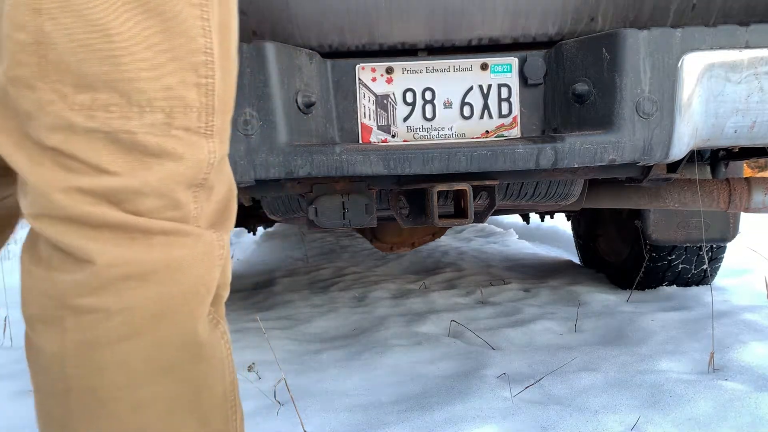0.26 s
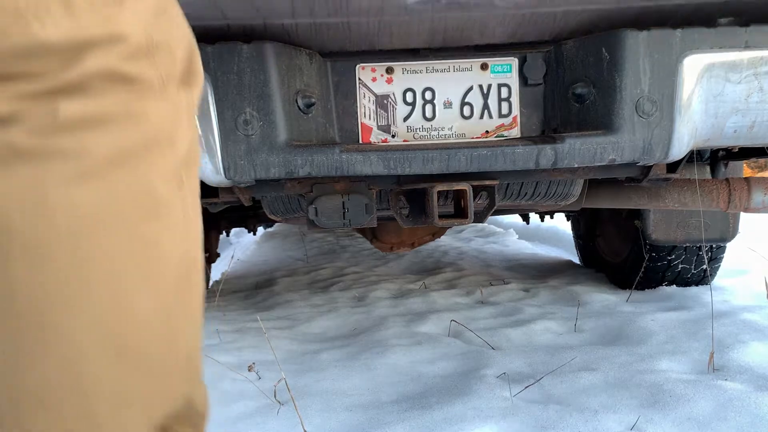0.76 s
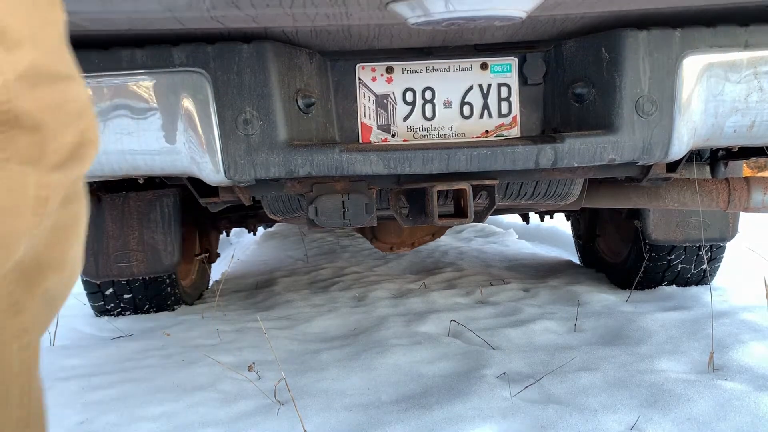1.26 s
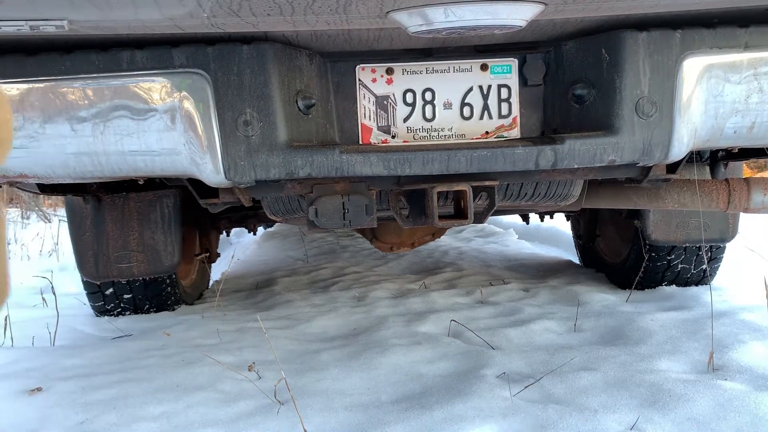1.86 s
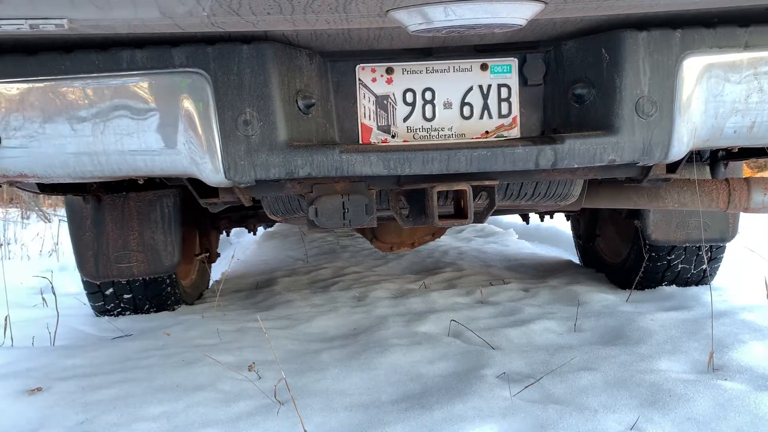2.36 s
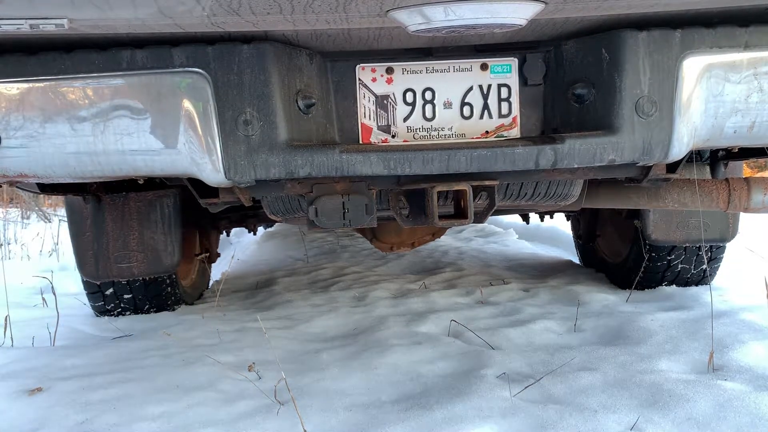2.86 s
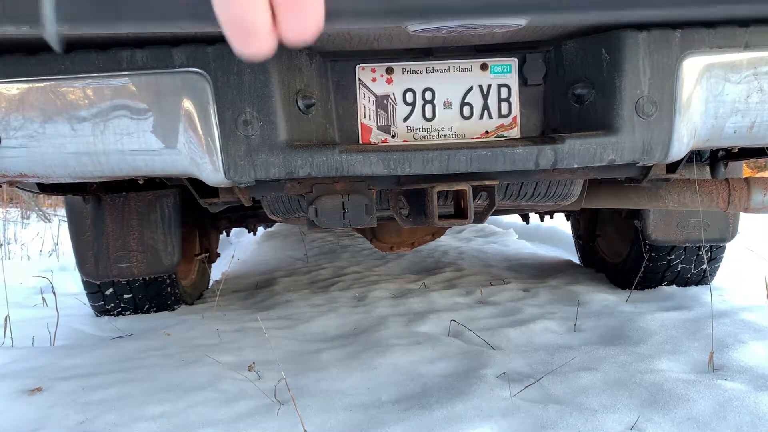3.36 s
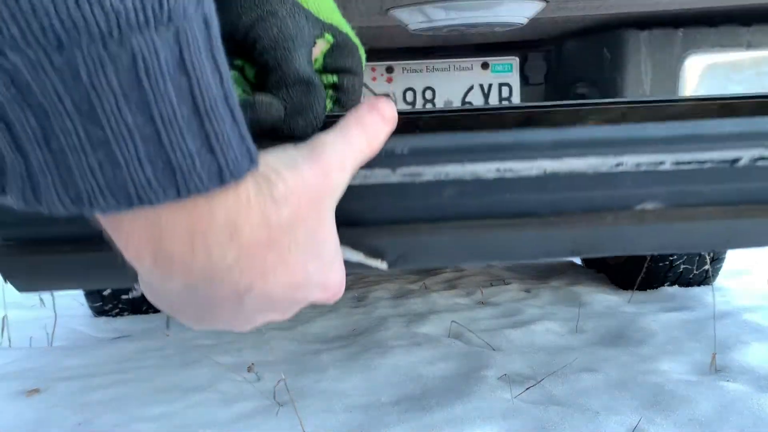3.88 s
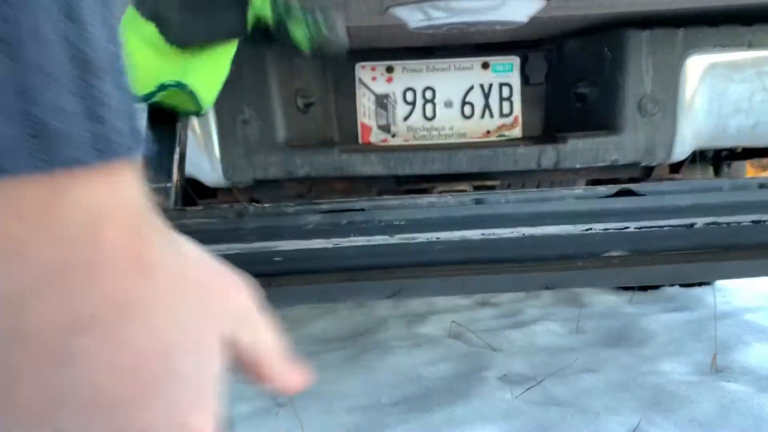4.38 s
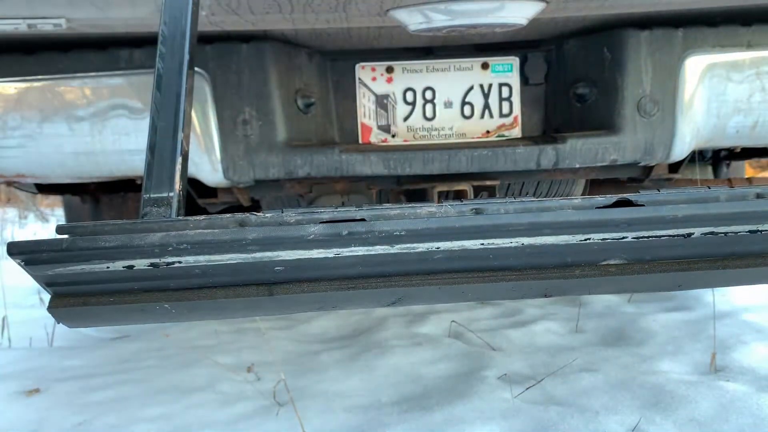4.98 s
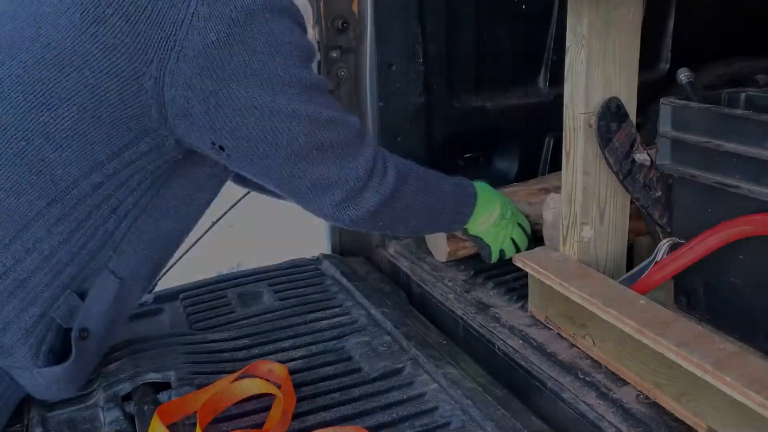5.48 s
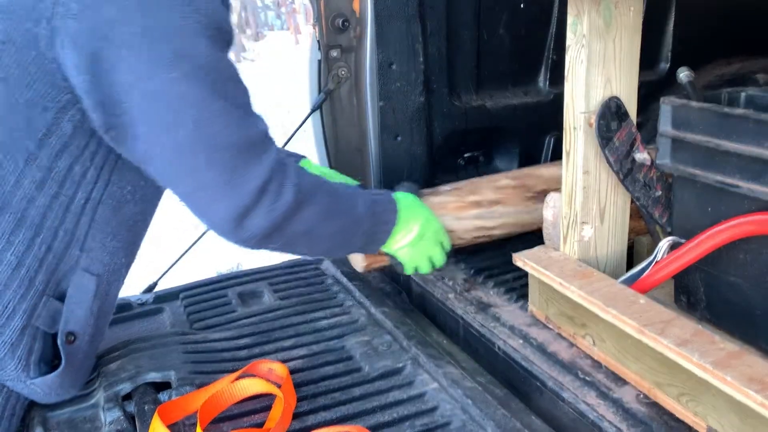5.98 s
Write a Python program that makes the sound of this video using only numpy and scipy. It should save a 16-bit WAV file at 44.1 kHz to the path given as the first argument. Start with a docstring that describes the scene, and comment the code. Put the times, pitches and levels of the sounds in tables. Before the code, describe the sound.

Outdoors in snow: cloth rub, crunching steps, jingling pins, a heavy rail dragged and dropped in two bumps, silence, then a log shoved along.

```python
"""Unloading a pickup in snow

Someone in canvas work trousers walks through crusted snow behind a pickup, steel pins jingling in one hand.
A steel rail is dragged off the truck bed with a clank and set down in two bumps; the pins jingle again.
After a fade through silence, a log scrapes over the bed liner and knocks against the bed.
Blows are decaying octave noise plus damped modes, pins are clicks and modes, rubbing is shaped grainy noise."""
import sys
import numpy as np
from scipy import signal
from scipy.fft import rfft, irfft, next_fast_len
from scipy.io import wavfile
from scipy.ndimage import uniform_filter1d, map_coordinates

SR = 44100
rng = np.random.default_rng(int(sys.argv[2]) if len(sys.argv) > 2 else 0)


def put_to_file(sound):
    """Save the sound as 16-bit audio at rate SR, in the file named by the first command-line argument."""
    columns = np.atleast_2d(sound).T  # one column per channel
    safe = np.clip(columns, -1, 1)
    whole_steps = np.round(safe * 32767)
    wavfile.write(sys.argv[1], SR, whole_steps.astype(np.int16))


N = 274743
TIME = np.arange(N) / SR
OCTAVES_HZ = 50 * 2 ** np.arange(9)

# Boots in snow. Each row: start in seconds, level in dB, bass in dB, treble in dB.
STEPS = [(0.455, -46.5, 17.5, 8), (0.674, -16.5, -2, -31), (0.751, -10, -2, -5), (0.769, -5.5, -3.5, -7.5),
         (0.804, -27.5, 14, -13), (0.864, -20, 0.5, -19)]
# Rail clanks on the truck bed. Each row: start in seconds, level in dB, bass in dB, treble in dB,
# rise in seconds, length factor.
KNOCKS = [(2.917, -8, -29.5, -4.5, 0.00098, 1), (2.928, -8, -17, -21, 0.0021, 0.4),
          (2.972, -11, -10, -2.5, 0.0011, 0.8)]
# Rail bumps down. Each row: start in seconds, level in dB, bass in dB, treble in dB,
# rise in seconds, length factor.
BUMPS = [(4.007, -4, -14, -9, 0.0018, 0.61), (4.02, -21, 7.5, -20, .003, 0.64),
         (4.168, -15, -11, -5, .002, 0.32), (4.1725, -7, -6, -4.5, 0.0015, 0.58),
         (4.181, -12.5, -3, -4.5, .0012, .45), (4.197, -9, -6, -15, 0.0012, 0.44),
         (4.202, -10, -14.5, -1.5, 0.00147, 0.71), (4.216, -22.5, 7, -14, .003, 0.47)]


def amp(db):
    """Amplitude of a level in dB."""
    return 10 ** (np.asarray(db) / 20)


def unit(x):
    """x at rms 1."""
    return x / np.sqrt(np.mean(x ** 2) + 1e-20)


def along(points, hz):
    """Interpolate (Hz, value) points on a log frequency axis."""
    f, v = np.transpose(points)
    return np.interp(np.log(hz + 1), np.log(f + 1), v)


def wobble(rate_per_s, size=N):
    """Smooth random curve through rate_per_s knots a second."""
    knots = rng.standard_normal(int(size * rate_per_s / SR) + 4)
    return map_coordinates(knots, [np.arange(size) * rate_per_s / SR])


def filtered(x, response):
    """x times a complex response of frequency."""
    size = x.shape[-1]
    m = next_fast_len(size + 4096)
    return irfft(rfft(x, m) * response(np.fft.rfftfreq(m, 1 / SR)), m)[..., :size]


def coloured(x, spectrum):
    """x through (Hz, dB) points."""
    return filtered(x, lambda hz: amp(along(spectrum, hz)))


def add(track, start_s, sound):
    """Mix a sound in at start_s."""
    part = track[:, max(round(start_s * SR), 0):][:, :sound.shape[-1]]
    part += sound[..., :part.shape[-1]]


def ports(pair, lead_ms, scatter):
    """Direct and scattered sound reach two microphones; above 7.5 kHz the delay is the same for every source."""
    # Share of unrelated sound. Each row: frequency in Hz, mixing angle in rad before the scatter factor.
    stray_angles = [(100, 0.13), (400, 0.33), (1000, 0.64), (2500, 0.56), (7000, 0.9), (9500, 0.16),
                    (16000, 0.033)]

    def half_delay(hz):
        delay_ms = np.interp(hz, [5500, 7500], [lead_ms, -.288])
        return np.exp(1j * np.pi * hz * delay_ms / 1000 * np.array([[1], [-1]]))

    def shares(hz):
        angle = scatter * along(stray_angles, hz)
        return np.array([np.cos(angle), np.sin(angle)])

    direct, stray = filtered(pair, shares)
    return filtered(np.array([direct + stray, direct - stray]), half_delay)


def grainy(rate_per_s, depth_db, size=N):
    """Two noises bunched into the same tiny slips."""
    slips = amp(depth_db * wobble(rate_per_s, size=size))
    return unit(rng.standard_normal((2, size)) * slips)


def ring(modes, t, age, vary_db, detune):
    """Damped modes; each contact point and grip gives them new strengths and slightly new pitches."""
    total = 0
    for hz, db, t60 in modes:
        decay = amp(db + vary_db * rng.normal() - 60 * age / t60)
        pitch_hz = hz * (1 + detune * rng.normal())
        total = total + decay * np.sin(2 * np.pi * (pitch_hz * t + rng.random((2, 1))))
    return total


def blows(rows, body, modes, ring_db, grit_db, gain_db, cycles):
    """Each blow is a gritty burst whose octaves die at their own speeds, plus the ring of the body."""
    out, t = np.zeros((2, N)), np.arange(SR * 4 // 9) / SR
    body = np.array(body)
    band_db, band_t60 = along(body[:, [0, 1]], OCTAVES_HZ), along(body[:, [0, 2]], OCTAVES_HZ)

    def octave(hz):
        distance = np.abs(np.log2((hz + 1) / OCTAVES_HZ[:, None, None]))
        return np.sqrt(np.clip(1 - distance, 0, 1))

    def build_up(hz):  # the heavy, low motion takes longest to start
        return 1 - np.exp(-(t * hz / cycles) ** 2)

    for start_s, db, bass_db, treble_db, rise_s, length in rows:
        age = t / max(length, .1)
        colour_db = along([(110, bass_db), (300, 0), (2500, 0), (7000, treble_db)], OCTAVES_HZ)
        bands = filtered(grainy(350, grit_db, size=len(t)), octave)
        ringing = sum(ring([mode], t, age, vary_db=2.5, detune=0.011) * build_up(mode[0]) for mode in modes)
        sound = amp(ring_db) * ringing
        for band, hz, level_db, t60 in zip(bands, OCTAVES_HZ, band_db + colour_db, band_t60):
            shape = amp(level_db - 60 * age / t60) * build_up(hz)
            sound = sound + unit(band * shape) * np.sqrt(np.mean(shape ** 2))
        add(out, start_s, amp(db + gain_db) * sound * (1 - np.exp(-t / max(rise_s, 1e-4))))
    return out


def contacts(rows, rise_s, length):
    """Give contacts of one kind their rise and length factor: the softer, the shorter."""
    halving_db = 43  # a contact this much softer dies twice as fast
    hardest_db = max(row[1] for row in rows)
    return [(*row, rise_s, length * .5 ** ((hardest_db - row[1]) / halving_db)) for row in rows]


def footsteps():
    """Boots break the crust: noise bursts without modes."""
    # Octave spread of a blow on snow. Each row: frequency in Hz, level in dB, t60 in seconds at length 1.
    snow = [(47.5, 0.5, 0.71), (99, -0.5, 0.43), (197, -11, 0.83), (397, -6.5, 0.39), (1570, -15.5, 0.37),
            (3270, -13.5, 0.17), (12800, -11, 0.29)]
    rows = contacts(STEPS, rise_s=0.003, length=0.92)
    return blows(rows, snow, [], ring_db=0, grit_db=1.5, gain_db=-7, cycles=0.61)


def bed_knocks():
    """The rail strikes the truck bed and excites its damped modes."""
    # Octave spread on the bed. Each row: frequency in Hz, level in dB, t60 in seconds at length 1.
    bed = [(50, -13, 0.46), (118, -1.5, 0.42), (402, -5.5, 0.39), (895, -1, 0.1), (1790, -9.5, 0.094),
           (3600, -13, 0.24), (8150, 4, 0.044), (12940, -3.5, 0.098)]
    # Ringing modes of the bed. Each row: frequency in Hz, level in dB, t60 in seconds at length 1.
    bed_modes = [(128.2, -13, 0.7), (174, -9.5, 0.35), (330, -14, 0.65), (381, -2.5, 0.52),
                 (420, -6.5, 0.22), (542, -4, 0.19), (637, -2.5, 0.11), (767, -4, 0.12), (860, -6, 0.17),
                 (1027, -6, 0.17), (1170, -9.5, 0.22), (1560, -11.5, 0.11), (1930, -11, .13),
                 (2245, -13.5, 0.16), (2490, -16.5, 0.18), (3950, -12.5, .1)]
    return blows(KNOCKS, bed, bed_modes, ring_db=-1.0, grit_db=-1.5, gain_db=-4.5, cycles=0.97)


def rail_bumps():
    """The rail hits the ground and rings in its own damped modes."""
    # Octave spread of the rail. Each row: frequency in Hz, level in dB, t60 in seconds at length 1.
    rail = [(50, -12, 0.97), (101, 4, 0.39), (382, -21.5, 0.66), (1076, -16.5, 0.32), (2580, -16.5, 0.18),
            (6440, -2, 0.13), (12580, 2.5, 0.067)]
    # Ringing modes of the rail. Each row: frequency in Hz, level in dB, t60 in seconds at length 1.
    rail_modes = [(116, -6.5, 0.4), (163, -20, 0.35), (337, -5, 0.27), (384.8, -4, 0.34), (684, -7, 0.22),
                  (840, -2.5, 0.14), (1000, 7, 0.05), (1157, 6, 0.053), (1560, -7, 0.085), (2000, -4, 0.1),
                  (2230, -6.5, 0.1), (2405, 0, 0.085), (2610, -3.5, 0.07), (3940, -5.5, 0.07),
                  (4750, -12.5, .1)]
    return blows(BUMPS, rail, rail_modes, ring_db=-5.5, grit_db=1.5, gain_db=-7.0, cycles=2.2)


def rail_taps():
    """Light taps and scuffs of the rail: brief noise over a weak ring."""
    # Taps. Each row: start in seconds, level in dB, bass in dB, treble in dB.
    taps = [(1.965, -24.5, -20, -23), (2.138, -21, 14, -2), (2.343, -21.5, -14, -13),
            (2.834, -16, -19.5, -3), (2.869, -24, -11.5, 18), (3.006, -17.5, 4, -20), (3.031, -19.5, 9, 3),
            (3.08, -20, 11, 5), (3.186, -34, -4, 7.5), (3.276, -35.5, 3, 6), (3.332, -38.5, -6, 6),
            (3.557, -27.5, -16.5, -26), (3.610, -32.5, 6, 3), (4.163, -20.5, -0.5, -3),
            (4.274, -31, -4.5, -4), (4.304, -38, 7, 11), (4.376, -42.5, 2, 20), (4.652, -41, -16, 22)]
    # Octave spread of a tap. Each row: frequency in Hz, level in dB, t60 in seconds at length 1.
    light = [(47.1, -8.5, 0.16), (299.6, -5.5, 0.064), (1000, -6, 0.074), (2300, -12, 0.12),
             (5000, -3.5, 0.007), (13060, 0, 0.024)]
    # Ringing modes of a tap. Each row: frequency in Hz, level in dB, t60 in seconds at length 1.
    light_modes = [(304, -6.5, .2), (1210, -1.5, 0.082), (2470, -9, 0.25), (2690, -8.5, 0.23)]
    rows = contacts(taps, rise_s=.002, length=0.95)
    return blows(rows, light, light_modes, ring_db=-18.0, grit_db=3.0, gain_db=-9.0, cycles=0.98)


def log_knocks():
    """The log hits the bed: damped modes that build up over a few cycles."""
    # Knocks. Each row: start in seconds, level in dB, bass in dB, treble in dB,
    # rise in seconds, length factor.
    hits = [(6.203, -7.5, -3.5, -9.5, 0.001, 0.62), (6.2095, -7.5, 1, -22, 0.0026, 0.91),
            (6.219, -11, 16, -10, 0.0016, 0.54)]
    # Octave spread of the log. Each row: frequency in Hz, level in dB, t60 in seconds at length 1.
    wood = [(50, 7.5, .5), (118, 2.5, 0.41), (400, -6, 0.23), (800, -4.5, 0.21), (1600, -8.5, 0.12),
            (3200, -11.5, 0.082), (6400, -20, 0.15), (12800, -16, 0.14)]
    # Ringing modes of the log. Each row: frequency in Hz, level in dB, t60 in seconds at length 1.
    wood_modes = [(160, -6, .3), (456, -1.5, 0.26), (593, -5, 0.12), (873, -13, 0.066), (1158, -2, .07),
                  (1920, -12, .06), (2380, -2.5, 0.04), (2840, -15, 0.051), (3210, -9.5, 0.078),
                  (4010, -7.5, 0.06)]
    return blows(hits, wood, wood_modes, ring_db=1.0, grit_db=2.0, gain_db=-3.0, cycles=2.18)


def dull_thuds():
    """Short, damped thuds of rail and log."""
    # Thuds. Each row: start in seconds, level in dB, bass in dB, treble in dB,
    # rise in seconds, length factor.
    thuds = [(3.266, -14.5, -1.5, 7, 0.0012, 0.14), (5.828, -12.5, 7.5, -50, 0.0015, 0.52),
             (5.837, -12, -8, -45, .0012, 0.62), (5.864, -21.5, 6.5, -24, 0.0022, 0.5),
             (6.169, -17.5, -20, -26, 0.0014, 0.38)]
    # Octave spread of a thud. Each row: frequency in Hz, level in dB, t60 in seconds at length 1.
    dull = [(49.3, -28, 0.34), (142, -0.5, 0.77), (400, -13.5, 0.219), (800, -15, 0.31),
            (1585, -18.5, 0.13), (3214, -9, 0.06), (6400, -30, 0.1), (12800, -12, 0.241)]
    # Ringing modes of a thud. Each row: frequency in Hz, level in dB, t60 in seconds at length 1.
    dull_modes = [(173.5, 1.5, 0.216), (350, -5, 0.22), (414, 0.5, 0.117), (515, -5.5, 0.051),
                  (847, -4.5, 0.11), (1560, -12, 0.057)]
    return blows(thuds, dull, dull_modes, ring_db=-0.5, grit_db=-2.5, gain_db=-7, cycles=0.42)


def snow_crunches():
    """Lumps of snow give way under the rail: very gritty bursts without modes."""
    # Crunches. Each row: start in seconds, level in dB, bass in dB, treble in dB.
    lumps = [(2.363, -24, 6, -6), (2.406, -27, -4, 18.5), (2.448, -20.5, -3, 12), (2.509, -24, -3.5, -1)]
    # Octave spread of a crunch. Each row: frequency in Hz, level in dB, t60 in seconds at length 1.
    crunch = [(50, -19.5, .1), (200, -7, 0.16), (800, -7.5, 0.083), (3200, -5.5, 0.054), (12800, -6, 0.027)]
    rows = contacts(lumps, rise_s=.001, length=0.97)
    return blows(rows, crunch, [], ring_db=0, grit_db=6.0, gain_db=-11.5, cycles=0.6)


def impacts():
    """All blows of boots, rail and log share one delay and scatter at the microphones."""
    on_snow = footsteps() + snow_crunches()
    of_rail = bed_knocks() + rail_bumps() + rail_taps()
    return ports(on_snow + of_rail + log_knocks() + dull_thuds(), lead_ms=-0.08, scatter=0.93)


def overtones(low_hz, high_hz, t60, t, count):
    """A crowd of short, weak modes, different for every point of contact."""
    hz = np.exp(rng.uniform(np.log(low_hz), np.log(high_hz), count))
    return ring([(f, 0, t60) for f in hz], t, t, vary_db=4.0, detune=0) / np.sqrt(count)


def jingling():
    """Each shake scatters small touches of uneven strength at random over its length."""
    # Shakes. Each row: start in seconds, length in seconds, ping in dB, other modes in dB,
    # click in dB, clack in dB.
    shakes = [(1.008, .115, -38, -58, -23.5, -64.5), (4.775, .025, -37.5, -50, -31, -46),
              (4.82, .1, -32, -44, -37, -55), (4.951, .04, -45, -59, -39, -55)]
    touches_per_s, scatter_db = 110, 0.5
    length_factor = 0.6  # pins pressed together ring briefly
    touches = []
    for start_s, length_s, *levels_db in shakes:
        for _ in range(round(length_s * touches_per_s)):
            uneven_db = np.array(levels_db) + scatter_db * rng.standard_normal(len(levels_db))
            touches.append((start_s + length_s * rng.random(), *uneven_db, length_factor))
    return touches


def pins():
    """Small steel pins touch: a click, glints and a lower clack vary by contact point, then the pins ring."""
    # Pins touch. Each row: start in seconds, ping in dB, other modes in dB, click in dB, clack in dB,
    # length factor of the ring.
    clinks = [(0.921, -35, -39.5, -31, -40, 0.5), (1.257, -37, -63, -34, -45, .3),
              (1.352, -41, -44.5, -25, -45, .5), (1.377, -35, -44.5, -32, -44.5, 0.61),
              (1.398, -39, -59, -46, -63, 0.87), (1.491, -47, -53, -35, -45.5, .2),
              (1.66, -33, -39, -15.5, -45, 0.3), (1.702, -30, -60, -33, -38, .3),
              (1.707, -7.5, -59, -21.5, -27, 0.88), (4.718, -48.5, -60.5, -34, -37.5, .3),
              (4.747, -46.5, -45, -27, -39.5, 0.54), (4.765, -32, -35, -22.5, -38, .5),
              (4.782, -32, -49, -36.5, -50, .3), (4.8, -22.5, -27, -21, -38.5, 0.94),
              (4.888, -17, -49, -29.5, -58, 0.44), (4.901, -19, -29.5, -34.5, -65, .5),
              (4.937, -43, -50, -31, -55.5, .5), (4.962, -35, -57, -41, -49, .4),
              (4.98, -40, -59, -40, -54, 0.35), (5.012, -24, -54, -37.5, -48, .25),
              (5.018, -25, -54, -32.5, -53, .25), (5.03, -19, -50, -27.5, -48, 0.32),
              (5.062, -29, -40, -40.5, -42, 0.6), (5.126, -36, -54, -25, -38, 0.46),
              (5.137, -41, -51, -25, -36.5, .4)]
    # Ringing modes of the pins. Each row: frequency in Hz, level in dB, t60 in seconds at length 1.
    pin_modes = [(2980, -22, 0.18), (3360, -20.5, 0.235), (4760, -26.5, 0.22), (5130, -23, 0.24),
                 (7720, -4, 0.32), (9150, 6, 0.12), (10330, -9.5, 0.17), (10670, -4.5, .25),
                 (10770, -3, 0.49), (12200, -8.5, .2), (13100, 3.5, .1), (14950, 3.5, 0.15),
                 (15620, -4, 0.18)]
    # Clear ping of a pin. Each row: frequency in Hz, level in dB, t60 in seconds at length 1.
    ping_modes = [(13270, 1, 0.23), (9100, -19, 0.22)]
    # Bright click. Each row: frequency in Hz, relative level in dB per Hz.
    click_spectrum = [(1200, -35), (3000, -27), (6500, -11), (9800, 3.5), (11200, 4), (12000, -10.5),
                      (13300, 5), (15500, 2)]
    # Lower clack. Each row: frequency in Hz, relative level in dB per Hz.
    clack_spectrum = [(900, -32), (2700, -3.5), (4500, -8), (6800, 0), (9000, -16.5)]
    clink_rise_s, ping_rise_s, grip_s = 0.00045, 0.00058, .13
    burst_t60_s, glint_t60_s, clack_t60_s = 0.049, 0.077, 0.092
    out, t = np.zeros((2, N)), np.arange(SR // 4) / SR
    brief = t[:SR // 10]

    def burst(spectrum):
        noise = unit(coloured(grainy(540, 1.3, size=len(brief)), spectrum))
        return noise * amp(-60 * brief / burst_t60_s)

    for start_s, ping_db, modes_db, click_db, clack_db, length in clinks + jingling():
        age = t / max(length, .1)
        glints = overtones(8500, 15800, glint_t60_s, brief, count=5)
        click = amp(-2.5) * burst(click_spectrum) + amp(-2.0) * glints
        low_modes = overtones(2500, 7500, clack_t60_s, brief, count=8)
        clack = amp(0.5) * burst(clack_spectrum) + amp(-4.0) * low_modes
        contact = amp(click_db) * click + amp(clack_db) * clack
        add(out, start_s, contact * (1 - np.exp(-brief / clink_rise_s)))

        cluster = amp(modes_db) * ring(pin_modes, t, age, vary_db=3, detune=0.002)
        ping = amp(ping_db) * ring(ping_modes, t, age, vary_db=0.0, detune=0.0011)
        # loose pins keep buzzing against each other, which blurs their tones, until the fingers choke them
        chatter = 1 + .22 * wobble(160, size=len(t)) + .1 * wobble(1100, size=len(t))
        held = (1 - np.exp(-t / ping_rise_s)) * np.exp(-(t / grip_s) ** 2)
        add(out, start_s, (cluster + ping) * chatter * held)
    return ports(out, lead_ms=0.05, scatter=1.0)


def resonate(x, modes):
    """x through (Hz, width Hz, dB) resonances of alternating sign, at rms 1."""
    def response(hz):
        total = 0
        for k, (centre, width, db) in enumerate(modes):
            damping = 1j * hz * width
            total = total + (-1) ** k * amp(db) * damping / (centre ** 2 - hz ** 2 + damping)
        return total

    return unit(filtered(x, response))


def strokes(rows, rise_db_per_s, fall_db_per_s, axis=2):
    """Gain of rubbing strokes: each builds up, swells or sags, then dies; axis is the level column."""
    power = np.zeros(N)
    for row in rows:
        age, length_s, swell_db = TIME - row[0], max(row[1], .005), row[-1]
        held_db = row[axis] + swell_db * (np.clip(age / length_s, 0, 1) - .5)
        rise_db = rise_db_per_s * np.maximum(-age, 0)
        fall_db = fall_db_per_s * np.maximum(age - length_s, 0)
        power += amp(held_db - rise_db - fall_db) ** 2
    return np.sqrt(power)


def lumpy(x, patchy_db):
    """The patch that rubs keeps shifting, so that bands surge and sink on their own."""
    z = signal.stft(x, nperseg=512)[2]
    field = uniform_filter1d(rng.standard_normal(z.shape[1:]), size=4, axis=0)
    field = uniform_filter1d(field, size=5, axis=1)
    depth_db = patchy_db * np.interp(np.fft.rfftfreq(512, 1 / SR), [1500, 5000], [1, .3])
    return unit(signal.istft(z * amp(depth_db[:, None] * unit(field)), nperseg=512)[1][:, :N])


def grit():
    """Grains of frozen snow crack in clumps: many faint, a few sharp."""
    # Crushed snow and grit. Each row: frequency in Hz, relative level in dB per Hz.
    grit_spectrum = [(200, -14.5), (600, 0), (1150, -2.5), (1800, -12.5), (2900, -2), (4400, -14),
                     (7000, -18.5), (14000, -31.5)]
    grit_per_s, spread_db = 500, 5.5
    cracks = rng.random(N) < grit_per_s / SR
    size = amp(spread_db * np.minimum(rng.exponential(size=N), 3.5) + 3 * wobble(45))
    return lumpy(coloured(cracks * size * rng.standard_normal((2, N)), grit_spectrum), patchy_db=4)


def sliding():
    """Stick and slip on the ribbed liner drives the hollow truck bed, crushes grit and makes the steel sing."""
    # Rail pulled over the liner. Each row: start in seconds, length in seconds, drumming in dB,
    # scrape in dB, swell in dB.
    pulls = [(2.03, 0.27, -40.5, -37.5, -5), (2.365, 0.12, -30.5, -33.5, 0.5),
             (2.51, 0.062, -46, -27, -1.5), (2.7, 0.04, -39, -30.5, 2.5), (2.87, 0.046, -41, -32.5, -0.5)]
    # Steel edge catches and grates. Each row: start in seconds, length in seconds, level in dB, swell in dB.
    catches = [(2.362, 0.037, -47, -3), (2.447, 0.022, -29, -2), (2.836, 0.016, -29.5, -3)]
    # Log shoved along. Each row: start in seconds, length in seconds, judder in dB, scrape in dB, swell in dB.
    shoves = [(5.4, 0.47, -30.5, -32, -9), (5.88, 0.084, -35, -36.5, 10.5), (6.0, 0.095, -31.5, -34, 1.5),
              (6.145, 0.059, -32, -38.5, 4)]
    # Scrape on the liner. Each row: frequency in Hz, relative level in dB per Hz.
    liner = [(50, -13), (250, -3.5), (450, 1.5), (700, -5.5), (1100, -9), (2200, -14), (4500, -24.5),
             (7000, -25.5), (10000, -23), (14000, -32.5), (16000, -41)]
    # Low stick-slip judder. Each row: frequency in Hz, relative level in dB per Hz.
    judder_spectrum = [(25, -18.5), (50, 4.5), (170, -9.5), (270, -21.5), (600, -30), (2000, -81.5)]
    # Droning liner. Each row: frequency in Hz, width in Hz, relative level in dB.
    liner_modes = [(161, 40, 10), (290, 23, -6), (335, 110, -0.5), (480, 220, -15.5), (517, 13, -13.5),
                   (715, 52, -31)]
    # Scraping steel rail. Each row: frequency in Hz, width in Hz, relative level in dB.
    steel_modes = [(780, 110, -11), (1266, 27, 1.5), (2080, 65, 1), (2266, 70, 9), (2517, 30, 2),
                   (2990, 130, -8.5), (4030, 690, -6.5)]
    # Hollow truck bed. Each row: frequency in Hz, width in Hz, relative level in dB.
    hollow = [(110, 81, -4.5), (160, 45, 1), (199, 26, 0.5), (338, 29, -6)]
    pull_db_per_s, catch_db_per_s, shove_db_per_s = (404.5, 262), (1503, 600.5), (398.5, 231)  # rise, fall

    scrape = lumpy(coloured(grainy(120, 0.58), liner), patchy_db=3.5)
    judder = unit(coloured(grainy(60, 4.4), judder_spectrum))
    drone = resonate(grainy(90, 9.3), liner_modes)
    grate = resonate(grainy(160, 2.4), steel_modes)

    drumming = strokes(pulls, *pull_db_per_s, axis=2) * resonate(grainy(70, 2.9), hollow)
    friction = amp(-3.0) * scrape + amp(-12) * drone + amp(-13) * judder
    friction = friction + amp(-6.5) * grit() + amp(-15) * grate
    pulling = strokes(pulls, *pull_db_per_s, axis=3) * friction
    catching = strokes(catches, *catch_db_per_s) * grate

    juddering = strokes(shoves, *shove_db_per_s, axis=2) * (judder + amp(-10.5) * drone)
    scraping = strokes(shoves, *shove_db_per_s, axis=3) * scrape
    return ports(drumming + pulling + catching + juddering + scraping, lead_ms=-0.066, scatter=1.04)


def trousers():
    """Canvas ribs rub over each other, close by and to the left."""
    # A leg or sleeve swings past. Each row: start in seconds, length in seconds (at least 0.005 is used),
    # rub in dB, hiss in dB, swell in dB.
    swishes = [(0.025, 0.26, -38.5, -37, -7.5), (0.112, 0.012, -30, -35, 0), (0.19, 0.032, -28, -33.5, -3),
               (0.262, 0.037, -34, -56, 2), (0.455, 0.083, -32.5, -37, -9), (0.52, 0.16, -41.5, -35, 1),
               (0.66, 0.028, -33.5, -31.5, -9), (1.01, 0.13, -30.5, -32.5, -2.5),
               (1.14, 0.031, -39, -38.5, 8), (1.255, 0.042, -35, -41, 0.5),
               (1.522, 0.0039, -32.5, -36, 7.5), (1.64, 0.088, -40.5, -45, 7),
               (2.02, 0.23, -39.5, -38.5, -4.5), (2.38, 0.034, -42.5, -41.5, -4),
               (2.465, 0.29, -36, -33, -3), (3.04, 0.065, -34, -41.5, -0.5), (3.51, 0.065, -50.5, -61, -6),
               (3.955, 0.045, -49, -53, 0.5), (4.06, 0.035, -43, -52.5, -5.5)]
    # Rub of the cloth. Each row: frequency in Hz, relative level in dB per Hz.
    rub_spectrum = [(40, -15), (170, -0.5), (400, 0), (750, -1.5), (1250, -2), (2000, -4), (4000, -16.5),
                    (6500, -26), (12000, -36)]
    # Hiss of the cloth. Each row: frequency in Hz, relative level in dB per Hz.
    hiss_spectrum = [(1500, -39), (4000, 5), (6500, 2.5), (8700, 11), (11000, 8), (14200, 11), (15000, -14),
                     (16000, -22.5)]
    swish_db_per_s = (379, 275)  # rise, fall
    rustle_db, rustle_until_s, rustle_fall_db_per_s = -51, 1.84, 26

    rub = lumpy(coloured(grainy(220, 1.1), rub_spectrum), patchy_db=4)
    hiss = unit(coloured(grainy(300, 1.7), hiss_spectrum))
    pressure = amp(1.8 * wobble(35))
    # the cloth never rests while the legs move
    rustle = amp(rustle_db - rustle_fall_db_per_s * np.maximum(TIME - rustle_until_s, 0))
    rubbing = np.hypot(strokes(swishes, *swish_db_per_s, axis=2), amp(-6.0) * rustle)
    hissing = np.hypot(strokes(swishes, *swish_db_per_s, axis=3), rustle)
    return ports((rub * rubbing + hiss * hissing) * pressure, lead_ms=0.26, scatter=0.46)


def boom(rows, gain_db, fall_db_per_s):
    """Power per sample of the low rumble that heavy blows leave behind; gain is against the blow."""
    rise_s = .09
    power = 0
    for start_s, db, *_ in rows:
        age = np.maximum(TIME - start_s, 0)
        power = power + (np.minimum(age / rise_s, 1) * amp(db + gain_db - fall_db_per_s * age)) ** 2
    return power


def outdoors():
    """A low rumble of air, swelling after heavy blows, under a faint, wide hush."""
    # Rumble of air. Each row: frequency in Hz, relative level in dB per Hz.
    rumble_spectrum = [(13, -39), (22, -1.5), (65, 6.5), (152, -2.5), (243, -26), (329, -20.5),
                       (400, -16.5), (520, -42), (880, -120)]
    # Hush of the open air. Each row: frequency in Hz, relative level in dB per Hz.
    hush_spectrum = [(100, -6), (400, -7), (1000, -8.5), (3000, -18), (7000, -27.5), (11000, -23),
                     (14000, -26.5), (16000, -41.5)]
    air_db, hush_db = -51, -55.5
    rumble = unit(coloured(grainy(13, 2.3), rumble_spectrum))
    hush = unit(coloured(grainy(17, 2.0), hush_spectrum))
    power = amp(air_db) ** 2 + boom(STEPS, -20.5, 34.7) + boom(KNOCKS, -25.5, 39) + boom(BUMPS, -24, 46)
    return ports(rumble * np.sqrt(power) + hush * amp(hush_db), lead_ms=0, scatter=1.5)


def scene():
    """Sum of all sources."""
    return impacts() + pins() + sliding() + trousers() + outdoors()


def record(dry):
    """A fade through silence joins the two scenes; the loudest peaks are rounded and the band is limited."""
    fade_out = np.interp(TIME, [5.033, 5.338], [1, 0]) ** 2.9
    fade_in = np.interp(TIME, [5.02, 5.728], [0, 1]) ** 9.66
    x = dry * (fade_out + fade_in)
    x = x / (1 + np.abs(x / .92) ** 6) ** (1 / 6)
    top_hz = 15850
    return filtered(x, lambda hz: np.interp(hz, [top_hz, top_hz + 450], [1, 0]))


dry = scene()
out = record(dry)
put_to_file(out)
```